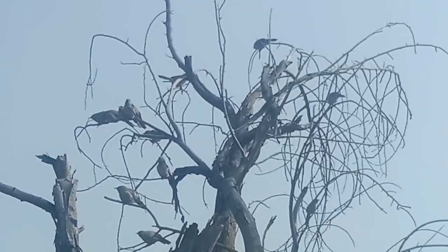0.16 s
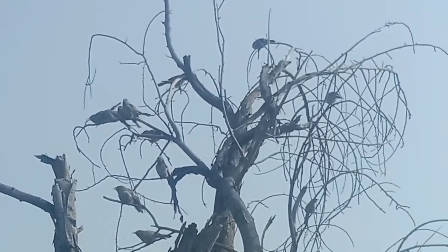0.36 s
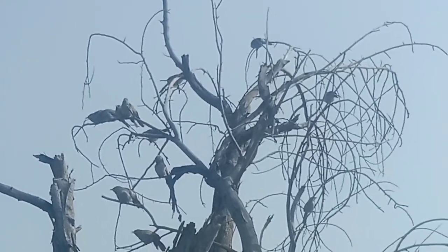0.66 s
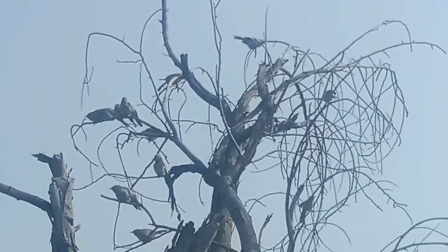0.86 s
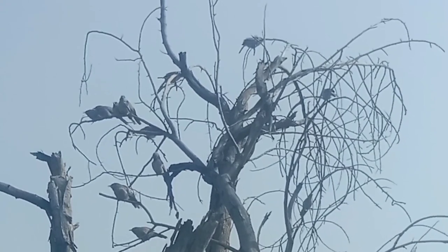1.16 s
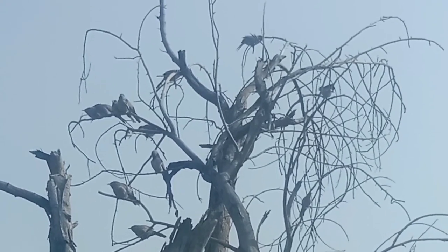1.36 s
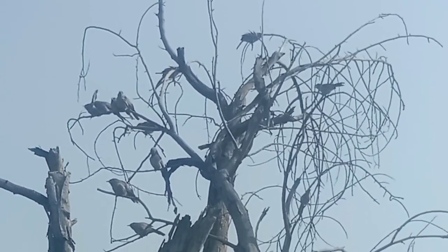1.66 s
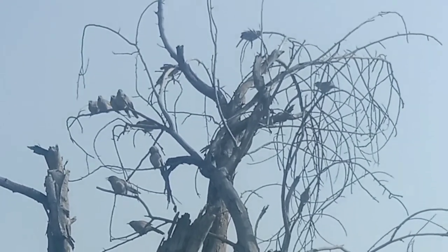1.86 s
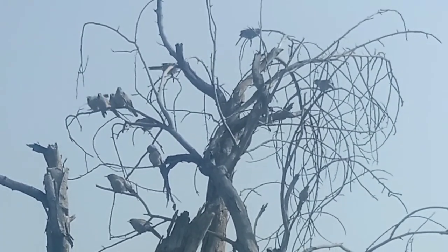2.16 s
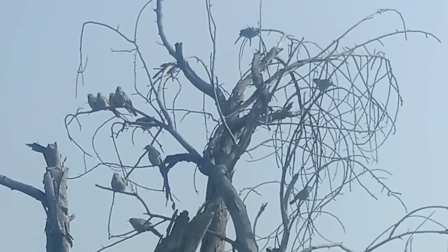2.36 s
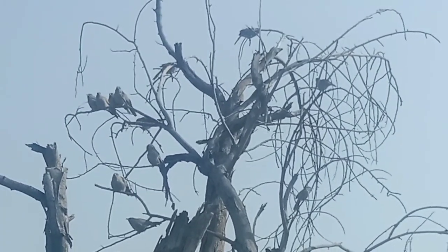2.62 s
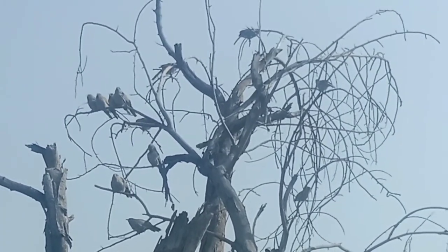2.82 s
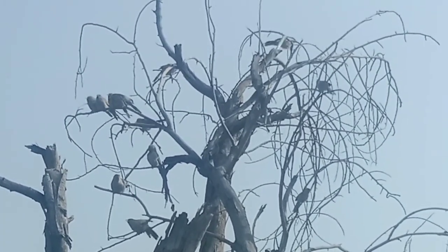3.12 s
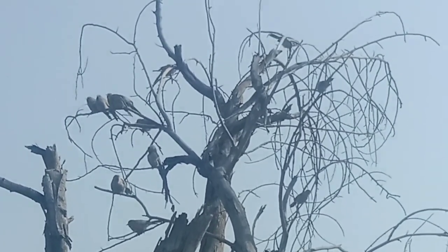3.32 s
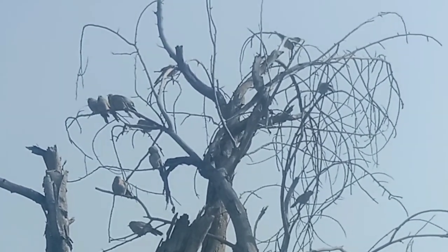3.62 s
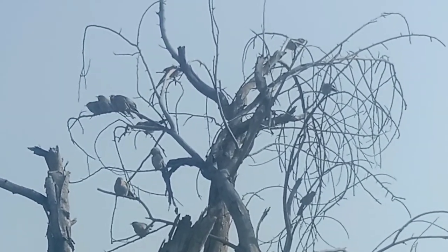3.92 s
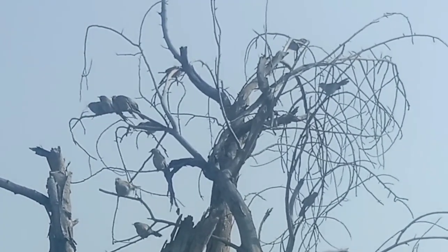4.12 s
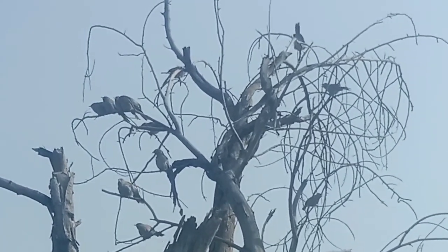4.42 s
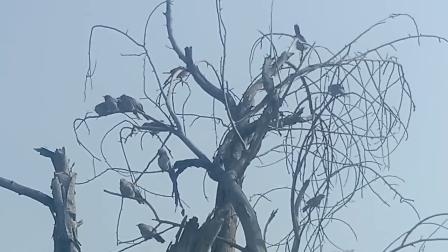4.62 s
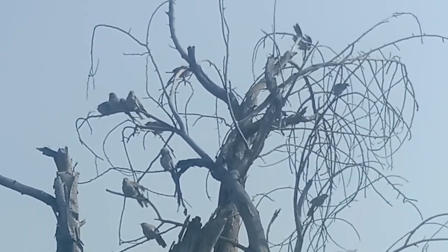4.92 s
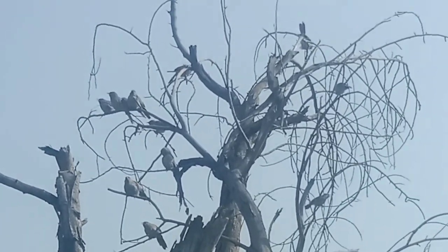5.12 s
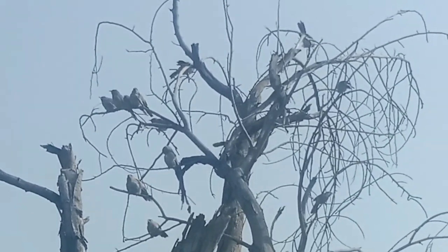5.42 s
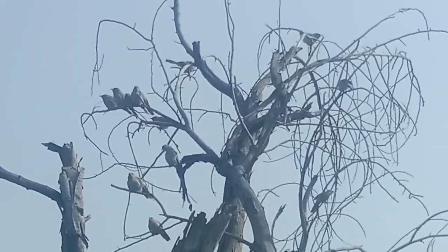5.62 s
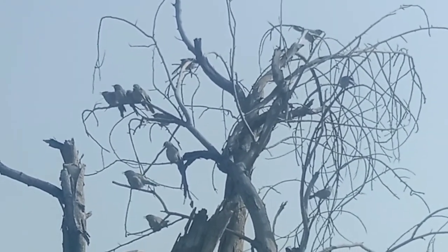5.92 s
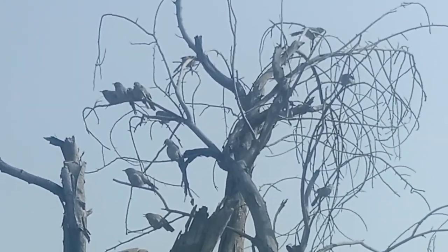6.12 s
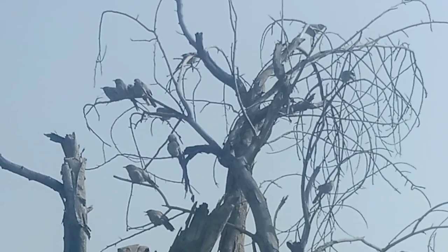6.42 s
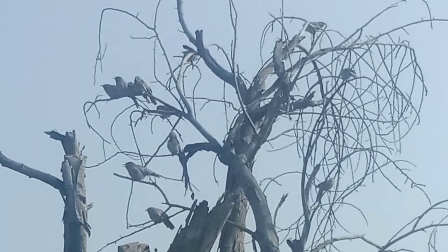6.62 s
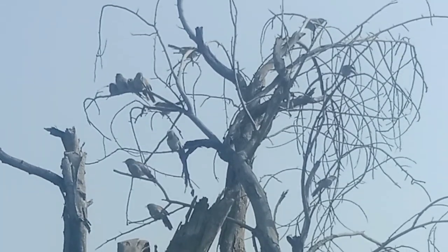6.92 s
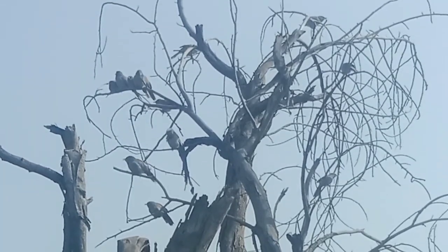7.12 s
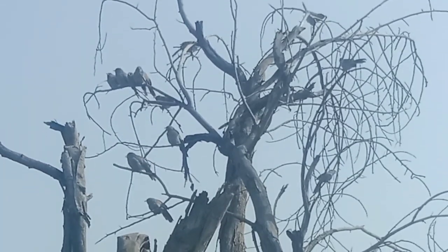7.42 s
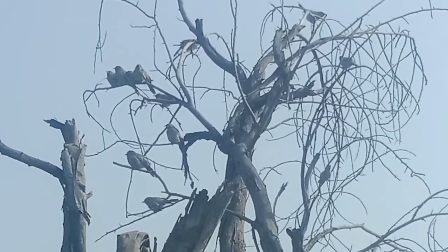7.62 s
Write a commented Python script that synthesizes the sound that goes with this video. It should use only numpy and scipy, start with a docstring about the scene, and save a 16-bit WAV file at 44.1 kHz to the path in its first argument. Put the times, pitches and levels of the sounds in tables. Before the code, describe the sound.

Many birds call at once, their quick squeals rising slightly then dropping steeply, over gritty rasping and breathy chatter. Low wind buffets and thumps the microphone repeatedly through the first five or so seconds, then mostly subsides. A few abrupt level dips tick early on. The chorus stays busy, then breaks into separate bursts near the end. Open air, very little echo, mono handheld microphone, a barely audible low drone far off.

```python
"""A flock of babblers chatters in a bare tree: arched squeals, summed from a few strong shaky partials,
stand out of a hoarse chorus of overlapping syllables, membrane slaps and breath, with low pulsed croaks.
Gusts of low noise buffet the microphone with short thumps, and a faint noise band drones far off.
The level dips abruptly a few times, and a noise suppressor thins the quiet parts above 1 kHz."""
import sys
import numpy as np
from scipy import signal
from scipy.fft import rfft, irfft
from scipy.io import wavfile
from scipy.ndimage import uniform_filter1d

SR = 44100
rng = np.random.default_rng(int(sys.argv[2]) if len(sys.argv) > 2 else 0)


def wrap_up_sound(samples):
    """Save the sound to the file named by the first command line argument, as 16-bit audio."""
    columns = np.atleast_2d(samples).T
    # keep every value between -1 and 1, then stretch to whole-number steps
    tamed = np.clip(columns, -1, 1)
    steps = np.round(tamed * 32767).astype(np.int16)
    wavfile.write(sys.argv[1], SR, steps)


def magnitude_from_level(level_db):
    """Linear magnitude for a level in decibels (20 dB per decade)."""
    exponent = np.asarray(level_db, float) / 20
    return 10 ** exponent


N = 342657  # samples

# Clear squeals. Each row: start in seconds, length in seconds, crest pitch in Hz, rise to it in Hz,
# sag from it in Hz, level in dB, second partial in dB relative to the first.
SQUEAL_ARCHES = [(0, 0.05, 2486, -200, 305, -39.5, -6), (0.092, 0.1, 2270, 299.5, 400, -46.5, -2.5),
                 (0.256, 0.1, 2657, -110.0, 150, -40.5, -5.5), (0.282, 0.1, 2376, 66, 331, -46.5, -2),
                 (0.364, 0.14, 2643, 150, 244.5, -49, -0.5), (0.405, 0.091, 2385, 139, 114, -41.5, -7),
                 (0.44, 0.11, 3145, 148.5, 55, -46, -1.5), (0.674, 0.12, 2427, 148.5, 374.5, -57, 1.5),
                 (0.773, 0.125, 3074, 100, 620, -44.5, -3), (0.845, 0.073, 2365, 255.5, 322, -38.5, -9),
                 (0.906, 0.073, 2770, -32.5, 634.5, -43, -4), (1.001, 0.062, 2220, 120.0, 51.5, -43, -4.5),
                 (1.325, 0.14, 2352, 290.5, 229, -35.5, -12), (1.663, 0.097, 2693, 600.5, 99, -42.5, -10.5),
                 (1.776, 0.137, 2680, 381.5, 622.5, -42.5, -7),
                 (1.858, 0.069, 2258, 163.5, 201.5, -38.5, -6.5),
                 (2.064, 0.08, 2403, 220, 286.5, -40, -9.5), (2.192, 0.055, 1947, 81, 19, -45.5, -8.5),
                 (2.254, 0.18, 3038, 790, 206, -43, -2), (2.44, 0.11, 2464, -38, 240.5, -46, 0.5),
                 (2.556, 0.08, 2640, -72.5, 111.5, -49.5, -5),
                 (2.704, 0.13, 2896, 149.5, 141, -57.5, -11.5),
                 (2.808, 0.089, 2784, 731.5, 367, -45.5, -6.5), (2.918, 0.074, 2840, 612, 77, -40.5, -11),
                 (2.975, 0.082, 2290, 59, 115, -42.5, -5), (3.064, 0.092, 2750, -120.0, 396, -46.5, 0),
                 (3.144, 0.095, 2558, 215, 118.5, -39.5, -8.5), (3.215, 0.071, 3040, 348, 468, -42, 3),
                 (3.29, 0.063, 2300, -100.0, 29.5, -40, -11.5), (3.413, 0.12, 3130, 306, 945.5, -43.5, 5),
                 (3.492, 0.1, 2372, 72.5, 185, -35.5, -8.5), (3.634, 0.1, 2710, 12.5, 108.5, -40, -9.5),
                 (3.814, 0.1, 2688, 264.5, 440, -39.5, -3), (3.815, 0.12, 2355, -130.0, 112, -43.5, 2.5),
                 (3.975, 0.11, 2422, 317, 430.0, -34.5, -14), (4.078, 0.1, 3057, 125.5, 83, -40.5, 1),
                 (4.123, 0.085, 2635, -28.5, 217, -41, -7), (4.237, 0.13, 2442, -25, 272.5, -45.5, 0.5),
                 (4.309, 0.12, 2913, 283, 25, -43.5, 2), (4.41, 0.088, 2863, 108, 276, -40.5, -4.5),
                 (4.517, 0.11, 2795, 9, 278.5, -42.5, -5.5), (4.636, 0.051, 2188, 89.5, 70, -49, -8.5),
                 (4.649, 0.096, 2690, -8, 205, -49, -2.5), (4.724, 0.081, 2453, 70, 270, -43, -1.5),
                 (4.911, 0.085, 2617, 178, 203.5, -43.5, -4.5), (4.921, 0.089, 3117, 646, 334, -52.5, 7.5),
                 (5.004, 0.076, 3537, 27, -31.5, -42.5, -0.5), (5.042, 0.11, 2876, 175, 295, -38, -2.5),
                 (5.139, 0.089, 2510, 95.5, 285.5, -45, 0), (5.23, 0.044, 2468, -130.0, 151.5, -44, -0.5),
                 (5.299, 0.066, 2374, 81.5, 456.5, -46.5, -4.5), (5.352, 0.05, 2780, 1, 700, -54, 3),
                 (5.444, 0.13, 2022, 5.5, 118, -59, -26), (5.518, 0.083, 2890, 297.5, 102, -53, -18),
                 (5.612, 0.14, 2636, 346.5, 443.5, -41.5, -8), (5.759, 0.078, 2490, 269.5, 18, -39.5, -5),
                 (5.825, 0.066, 2774, 150.5, 124.5, -47.5, -3),
                 (5.868, 0.137, 2430, -11.5, 433, -41.5, -3.5), (5.965, 0.056, 2630, 35.5, 493.5, -43, -7),
                 (6.049, 0.05, 2172, -130.0, 209, -39, -8.5), (6.133, 0.07, 2113, 64.5, 47, -44.5, -12.5),
                 (6.213, 0.077, 2137, 1, 95, -59, -15), (6.248, 0.16, 2030, 5.5, 61, -68, -14),
                 (6.524, 0.07, 2224, 154, 197, -54.5, -20), (6.649, 0.11, 2010, 151, -51, -47.5, -9.5),
                 (6.725, 0.11, 2782, 730, 581.5, -39.5, -7), (6.86, 0.1, 2394, 297.5, 297.5, -43.5, -6.5),
                 (6.996, 0.13, 2169, -1.5, 100, -55, -12), (7.14, 0.064, 2100, -1, 2, -67.5, -14),
                 (7.254, 0.086, 2155, -130.0, 63, -41.0, -7.5), (7.31, 0.078, 2052, -71, -78, -40.5, -9.5),
                 (7.442, 0.047, 2307, 100, 145.5, -49.5, -16), (7.566, 0.13, 2650, 451.5, 440.5, -43, -6),
                 (7.725, 0.07, 2703, 502, -1, -48, -10)]
# Squeals whose period doubles, so half lines show. Each entry: start in seconds, within 5 ms; an entry that
# meets no squeal start (5.525) adds nothing.
DOUBLED_STARTS = (2.7, 3.633, 4.516, 5.525)
# Treble gap in the squeals. Each row: frequency in Hz, gain in dB.
TREBLE_GAP = [(8300, -1), (9300, -11.5), (10200, -1.5), (12600, -4.5), (14000, -12)]
# Gusts on the microphone. Each row: start in seconds, length in seconds, level in dB,
# wait until the hardest thump in seconds, thump peak in dB.
WIND_GUSTS = [(0.0, 0.067, -42.5, 0.0068, -21), (0.078, 0.11, -46, 0.033, -20.5),
              (0.274, 0.071, -42.5, 0.014, -32.5), (0.349, 0.078, -47.5, 0.018, -33),
              (0.572, 0.058, -58.5, 0.017, -31.5), (0.822, 0.086, -43, 0.013, -39),
              (0.981, 0.1, -33.5, 0.061, -33), (1.1, 0.14, -39.5, 0.017, -23.5),
              (1.242, 0.12, -40.5, 0.095, -25), (1.42, 0.091, -38, 0.029, -22.5),
              (1.504, 0.092, -34.5, 0.086, -34.5), (1.619, 0.011, -30, 0.019, -18.5),
              (1.737, 0.11, -33.5, 0.084, -19), (1.883, 0.086, -41, 0.031, -27.5),
              (1.988, 0.069, -37.5, 0.034, -35.5), (2.042, 0.034, -32, 0.008, -22.5),
              (2.131, 0.052, -34.5, 0.027, -13), (2.203, 0.041, -40.5, 0.0074, -27.5),
              (2.268, 0.046, -29, 0.0091, -25.5), (2.341, 0.044, -40, 0.024, -28),
              (2.461, 0.067, -36.5, 0.021, -33), (2.604, 0.021, -37.5, 0.011, -21.5),
              (2.679, 0.021, -52, 0.0076, -41), (2.761, 0.014, -42.5, 0.0089, -32.5),
              (2.876, 0.057, -38.5, 0.079, -23), (2.954, 0.096, -38.5, 0.0021, -26.5),
              (3.107, 0.052, -36.5, 0.029, -26), (3.179, 0.057, -44, 0.0073, -31.5),
              (3.261, 0.07, -34.5, 0.022, -19), (3.341, 0.068, -36.5, 0.035, -24),
              (3.465, 0.15, -42.5, 0.0099, -18), (3.676, 0.047, -32, 0.023, -19.5),
              (3.737, 0.08, -40, 0.04, -16), (3.836, 0.12, -36, 0.1, -40.5),
              (3.988, 0.095, -36.5, 0.078, -23.5), (4.185, 0.036, -44.5, 0.026, -25.5),
              (4.243, 0.046, -42.5, 0.032, -31.5), (4.307, 0.13, -41, 0.081, -29),
              (4.668, 0.057, -55, 0.017, -34), (4.736, 0.13, -38.5, 0.089, -21),
              (5.145, 0.16, -61, 0.093, -58), (5.336, 0.11, -41.5, 0.024, -27.5),
              (5.472, 0.12, -31.5, 0.13, -23.5), (5.588, 0.11, -35.5, 0.056, -19.5),
              (5.971, 0.055, -62, 0.012, -35), (6.143, 0.049, -68, 0.013, -73),
              (6.96, 0.033, -61.5, 0.02, -58), (7.084, 0.039, -50.5, 0.0066, -29),
              (7.648, 0.1, -66, 0.039, -64.5)]
# Spectrum of the wind noise. Each row: frequency in Hz, relative level in dB.
WIND_SPECTRUM = [(20, -23.5), (50, 0), (90, 4.5), (140, 1.5), (215, -9.5), (400, -29), (550, -55.5),
                 (800, -82.5)]
# Bouts of hoarse chatter. Each row: start in seconds, length in seconds, effort in dB,
# brightness in dB of the partials above the first.
CHATTER_BOUTS = [(.01, 0.1, -46, -1.5), (0.073, 0.19, -54, -2.5), (0.257, 0.32, -44, -5),
                 (.61, .07, -54.5, -5.5), (0.706, 0.27, -42.5, -5.5), (0.994, 0.29, -41.5, -7),
                 (1.416, 0.16, -44.5, -6), (1.657, 0.23, -45.5, -8.5), (1.833, .13, -42, -0.5),
                 (1.975, 0.2, -44.5, -8.5), (2.27, 0.093, -42, -4), (2.356, 0.11, -44.5, -4.5),
                 (2.55, 0.058, -45.5, -7.5), (2.655, 0.3, -54.5, -6.5), (2.842, .04, -45, -10),
                 (2.892, 0.3, -40.5, -3.5), (3.172, 0.13, -41, -0.5), (3.341, 0.29, -41, -5.5),
                 (3.697, 0.16, -39.5, -5), (3.908, 0.22, -47.5, -1), (4.052, 0.18, -41, -5),
                 (4.271, 0.25, -46, -1.5), (4.627, 0.27, -44.5, -4), (4.994, 0.091, -43.5, 2.5),
                 (5.099, 0.18, -43.5, -4), (5.323, 0.1, -54.5, 1), (5.515, 0.056, -61, 3),
                 (5.621, 0.15, -43, -5.5), (5.823, 0.13, -45.5, -1), (6.015, .04, -48.5, 1),
                 (6.127, 0.028, -44.5, -9.5), (6.188, 0.055, -53, -7), (6.394, 0.11, -65, -6),
                 (6.536, 0.25, -46.5, -4), (6.856, 0.24, -43, -4.5), (7.251, 0.05, -44.5, -6),
                 (7.321, 0.31, -42.5, -5.5), (7.652, .07, -47.5, -3), (7.745, .05, -45.5, -7.5)]
# Colour of the chorus, with a gap near 9.3 kHz. Each row: frequency in Hz, gain in dB.
CHORUS_COLOUR = [(700, -58), (1200, -30.5), (1600, -18), (2000, -6), (2500, -6.5), (3200, -9), (4300, 0),
                 (5500, -7), (7000, -6.5), (8300, -24.5), (9300, -50.5), (10400, -35.5), (13000, -40),
                 (15400, -44.5)]
# Low croaks, the pulse rate of a rasp under the chatter. Each row: middle in seconds, level in dB.
CROAK_SWELLS = [(1.21, -61.5), (1.51, -64.5), (1.88, -60), (2.3, -62), (2.94, -64.5), (3.17, -59.5),
                (3.56, -62.5), (3.85, -65.5), (4.12, -59), (4.428, -58.5), (4.742, -60.5), (6.718, -61.5),
                (6.871, -62), (7.321, -66), (7.55, -59)]
# Abrupt dips of the whole sound, each with a tick. Each row: time in seconds, depth in dB.
LEVEL_DIPS = [(.06, 16), (.598, 11), (1.598, 7), (2.632, 9)]

RISE_POWER, SAG_POWER = 3.3, 4.1  # how late the pitch arch bends at its ends
# the third partial follows the second and fades as it climbs past the edge of the throat's range
THIRD_DB, THROAT_EDGE_HZ, ROLL_DB_PER_KHZ = -6.5, 7500, 20
SWELL_DB_PER_S, FADE_DB_PER_S = 401, 282  # how fast a bout sets in and dies away
PULSE_HZ = 349.6  # membrane slaps of the croaks and of the middle rasping bird


def evened(x):
    """Scales to rms 1."""
    return x / np.sqrt(np.mean(x ** 2) + 1e-20)


def coloured(x, points):
    """Filters by a spectrum given as points, joined along log frequency."""
    f, db = np.transpose(points)
    hz = np.arange(N // 2 + 1) * SR / N
    gain_db = np.interp(np.log(hz + 1), np.log(f + 1), db)
    return irfft(rfft(x) * magnitude_from_level(gain_db), N)


def wobble(size, rate_hz):
    """Smooth random drift of rms 1: noise through two equal one-pole lowpasses."""
    r = np.exp(-2 * np.pi * rate_hz / SR)
    drift = signal.lfilter([1], [1, -2 * r, r * r], rng.standard_normal(size + 2000))
    return evened(drift[2000:])  # without the filter's run-in


def add(mix, s, sound):
    """Mixes a sound in at time s, in seconds, trimmed to the mix."""
    at = round(s * SR)
    part = mix[max(at, 0):][:len(sound) + min(at, 0)]
    part += sound[max(-at, 0):][:len(part)]


def voice(hz, partials, jitter, flutter_db, flutter_hz):
    """A syrinx membrane: partials of one shaky pitch, each trembling in level, the high ones most."""
    shaky_hz = hz * (1 + jitter * wobble(len(hz), flutter_hz))
    phase = 2 * np.pi * np.cumsum(shaky_hz) / SR
    sound = np.zeros(len(hz))
    for k, db in partials:
        tremble_db = flutter_db * k ** .2 * wobble(len(hz), flutter_hz)
        sound += magnitude_from_level(db + tremble_db) * np.sin(k * phase + k)
    return sound


def squeals():
    """Each squeal slides up into a pitch arch, passes its crest and drops away steeply at the end."""
    out = np.zeros(N)
    slide = .022  # seconds added at each end
    for s, length, crest_hz, rise_hz, sag_hz, db, second_db in SQUEAL_ARCHES:
        u = np.arange(-slide, length + slide, 1 / SR) / length  # 0 to 1 along the arch
        inside = np.clip(u, -.04, 1.08)
        arch_hz = crest_hz - rise_hz * abs(1 - inside) ** RISE_POWER - sag_hz * abs(inside) ** SAG_POWER
        # 0 within the arch, growing to 1 at the far end of either slide
        past = (np.maximum(-u, 0) + np.maximum(u - 1, 0)) * length / slide
        second_db = second_db - 7.5 * past  # overtones thin out in the slides
        above_khz = np.maximum(3 * arch_hz - THROAT_EDGE_HZ, 0) / 1000
        third_db = THIRD_DB + second_db - ROLL_DB_PER_KHZ * above_khz
        partials = [(1, 0.018), (2, second_db), (3, third_db), (4, second_db - 28.5), (5, second_db - 36.5)]
        if np.isclose(DOUBLED_STARTS, s, atol=.005).any():
            partials += [(.5, -22.5), (1.5, -6), (2.5, -24 + 5.5)]
        hz = arch_hz * (1 - .09 * past ** 1.5)
        sound = voice(hz, partials, jitter=.009, flutter_db=3, flutter_hz=170)
        # loudest halfway along the arch, with an unsteady level
        level_db = db + 1.5 * wobble(len(u), 35) - 5 * np.minimum((2 * u - 1) ** 2, 1)
        level = np.sqrt(2) * magnitude_from_level(level_db - 10 * past)
        add(out, s - slide, level * sound * signal.windows.tukey(len(u), .25))
    return coloured(out, TREBLE_GAP)


def echoes(x):
    """Ground and walls nearby return a short diffuse tail, modelled as decaying noise."""
    t = np.arange(SR // 4) / SR
    t60 = .1  # seconds to fall by 60 dB
    tail = rng.standard_normal(len(t)) * magnitude_from_level(-60 * t / t60) * (t > .004)
    return signal.fftconvolve(x, tail / np.linalg.norm(tail))[:N]


def flock_effort():
    """Effort and brightness of the flock in dB: the loudest bout of the moment leads."""
    start, length, db, bright_db = np.transpose(CHATTER_BOUTS)
    t = np.arange(0, N + 200, 200)[:, None] / SR
    before = np.maximum(start - t, 0)
    after = np.maximum(t - start - length, 0)
    each_db = db - SWELL_DB_PER_S * before - FADE_DB_PER_S * after
    weight = magnitude_from_level(each_db) ** 2
    brightness = weight @ bright_db / weight.sum(1)
    return [np.interp(np.arange(N) / SR, t[:, 0], curve) for curve in (each_db.max(1), brightness)]


def wind():
    """Lumpy eddies of low noise come in abrupt gusts; the hardest eddy of each lands as a short thump."""
    # the background between gusts sinks in the pauses of the chatter
    calm_db = -83.5 + 4 * wobble(N, 8) + .3 * (flock_effort()[0] + 45)
    strength, thumps = magnitude_from_level(calm_db), np.zeros(N)
    t = np.linspace(-.02, .02, round(.04 * SR))
    for s, length, db, late, peak_db in WIND_GUSTS:
        size, turn = rng.random(2)
        gust = signal.windows.tukey(round((length + 0.017) * SR), 0.027 / (length + 0.013))
        add(strength, s - .008, magnitude_from_level(db) * gust)
        hz = 86.376 + 108.336 * size
        push = np.exp(-(t * hz / 0.5) ** 2) * np.cos(2 * np.pi * (hz * t + turn))
        add(thumps, s + late + t[0], magnitude_from_level(peak_db) * push)
    lumps = magnitude_from_level(4.8 * np.clip(wobble(N, 14.0), -3, 1.5))
    # each gust has a weaker wake around it
    strength += magnitude_from_level(-9.5) * uniform_filter1d(strength, 3500)
    eddies = evened(lumps * coloured(rng.standard_normal(N), WIND_SPECTRUM))
    highpass = signal.butter(2, 90, "high", fs=SR, output="sos")
    return signal.sosfilt(highpass, thumps + strength * eddies)


def drone():
    """A narrow band of distant noise that swells with the chorus."""
    middle_hz, width_hz = 420, 85
    hz = np.arange(N // 2 + 1) * SR / N
    bell = np.exp(-((hz - middle_hz) / width_hz) ** 2)
    band = irfft(rfft(rng.standard_normal(N)) * bell, N)
    level_db = -74.5 + 0.5 * (flock_effort()[0] + 31.5)
    return magnitude_from_level(level_db) * evened(band)


def syllables(count=110):
    """Overlapping shaky voices with half lines, each on a falling-ended arch, evened in loudness."""
    out = np.zeros(N)
    partials = [(1, 2.0), (1.5, -5), (2, 1.0), (2.5, -5.5), (3, 0.0), (4, -2.0), (5, 8.5)]
    for k, (late, low, arch, long, throb) in enumerate(rng.random((count, 5))):
        u = np.linspace(-1, 1, round((.09 + 0.0994 * long) * SR))
        hz = (2050 + 500 * low) * (1 - (0.0399 + .12 * arch) * u ** 2)
        sound = voice(hz, partials, jitter=.017, flutter_db=3.5, flutter_hz=200)
        # the membrane throbs 50 to 140 times a second
        throb_hz = 50 + 90 * throb
        sound = sound * (1 + .7 * np.cos(2 * np.pi * throb_hz * np.arange(len(u)) / SR))
        add(out, (k + late) / count * N / SR - .05, sound * signal.windows.hann(len(u)))
    # syllables overlap unevenly; the flock's effort alone sets the loudness
    return out / np.sqrt(uniform_filter1d(out ** 2, 3000) + 1e-9)


def pulses(hz, jitter, uneven_db):
    """Irregular slaps of the membrane, one click a cycle."""
    shaky_hz = hz * (1 + .05 * wobble(N, 5) + jitter * wobble(N, 150))
    turns = np.cumsum(shaky_hz) / SR
    return np.diff(np.floor(turns), prepend=0) * magnitude_from_level(uneven_db * rng.standard_normal(N))


def patchy(x, patchy_db, treble_db):
    """Different birds fill different parts of the range at each moment; the top comes in bursts."""
    hz, _, z = signal.stft(x, SR, nperseg=512)
    across = uniform_filter1d(rng.standard_normal(z.shape), 9, 0)
    field = evened(uniform_filter1d(across, 9, 1))
    bursts = evened(uniform_filter1d(rng.standard_normal(z.shape[1]), 5)) * (hz > 8800)[:, None]
    gain = magnitude_from_level(patchy_db * field + treble_db * bursts)
    return signal.istft(z * gain, SR, nperseg=512)[1][:N]


def chorus():
    """Syllables, three birds rasping in uneven pulses, and breath, driven by the flock's effort."""
    calls = syllables()
    slaps = sum(pulses(PULSE_HZ * size, jitter=0.13, uneven_db=-0.5) for size in (.85, 1, 1.2))
    slaps = evened(slaps + echoes(slaps))
    breath = evened(rng.standard_normal(N) * magnitude_from_level(2.1 * wobble(N, 140)))
    rasp = coloured(calls + magnitude_from_level(4.5) * slaps + magnitude_from_level(-10) * breath, CHORUS_COLOUR)
    rasp = patchy(rasp, patchy_db=3, treble_db=4)
    # the range of the first partial, split from the brighter rest
    first = signal.sosfiltfilt(signal.butter(4, 2800, fs=SR, output="sos"), rasp)
    effort_db, bright_db = flock_effort()
    return magnitude_from_level(effort_db) * (evened(first) + magnitude_from_level(bright_db) * evened(rasp - first))


def croaks():
    """Low multiples of the membrane's pulse rate, filtered out of its clicks, swell once a croak."""
    swell = np.zeros(N)
    for s, db in CROAK_SWELLS:
        add(swell, s - .085, magnitude_from_level(db) * signal.windows.tukey(round(.17 * SR), .7))
    clicks = pulses(PULSE_HZ, jitter=.03, uneven_db=4.5)
    low = coloured(clicks, [(750, -41.5), (1000, 8.5), (1180, -18.0), (1400, 7.5), (1700, 3.5), (2000, -55.5)])
    return swell * evened(low)


def scene():
    """Squeals and their echoes, chorus, croaks, wind and drone on one channel."""
    near = squeals()
    return (near + magnitude_from_level(-17) * echoes(near) + chorus() + croaks() + wind() + drone())[None]


def dipped(x):
    """The level drops at once, which ticks, and recovers evenly in dB within 60 ms."""
    t = np.arange(N) / SR
    dip_db = sum(db * (t > s) * np.clip(1 - (t - s) / .06, 0, 1) for s, db in LEVEL_DIPS)
    return x * magnitude_from_level(-dip_db)


def suppressed(x):
    """Noise suppressor: above 1 kHz, bins far below their band's mean power are pushed down further."""
    below_db, deepest_db = -17, -12  # threshold relative to the mean power, deepest cut
    hz, _, z = signal.stft(x, SR, nperseg=1024, noverlap=768)
    power = uniform_filter1d(uniform_filter1d(abs(z) ** 2, size=5, axis=1), size=3, axis=2)
    usual = uniform_filter1d(power.mean(2, keepdims=True), size=40, axis=1)
    noise = magnitude_from_level(below_db) ** 2 * usual
    gain = np.maximum(1 - noise / (power + 1e-20), magnitude_from_level(deepest_db))
    gain[:, hz < 1000] = 1
    return signal.istft(z * gain, SR, nperseg=1024, noverlap=768)[1][:, :N]


def band_limit(x):
    """A steep low-pass at the top of the band."""
    return signal.sosfilt(signal.butter(12, 15600, fs=SR, output="sos"), x)


def record(dry):
    """Abrupt level dips, then the noise suppressor."""
    finished = suppressed(dipped(dry))
    return band_limit(finished)


dry = scene()
out = record(dry)
wrap_up_sound(out)
```